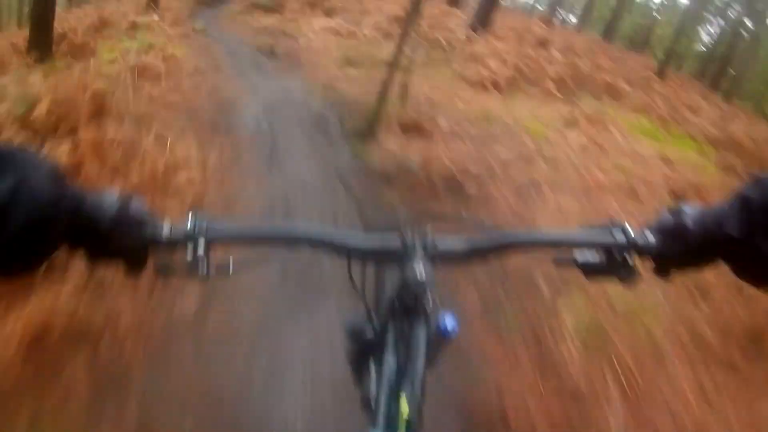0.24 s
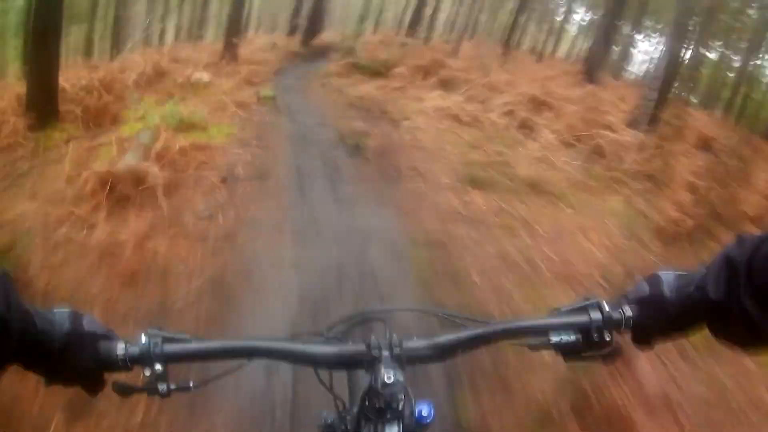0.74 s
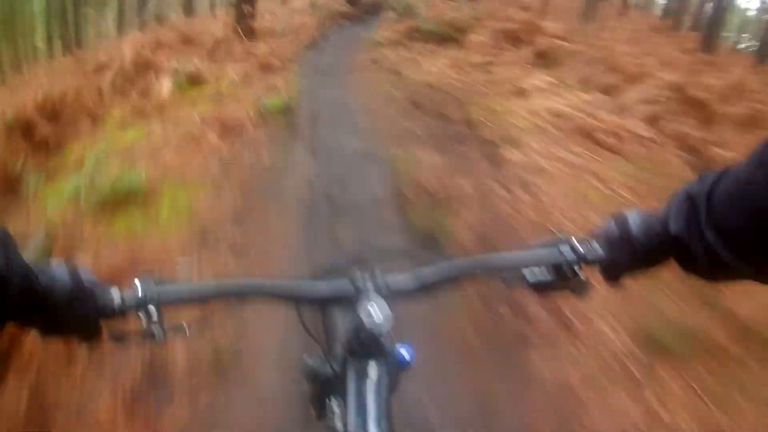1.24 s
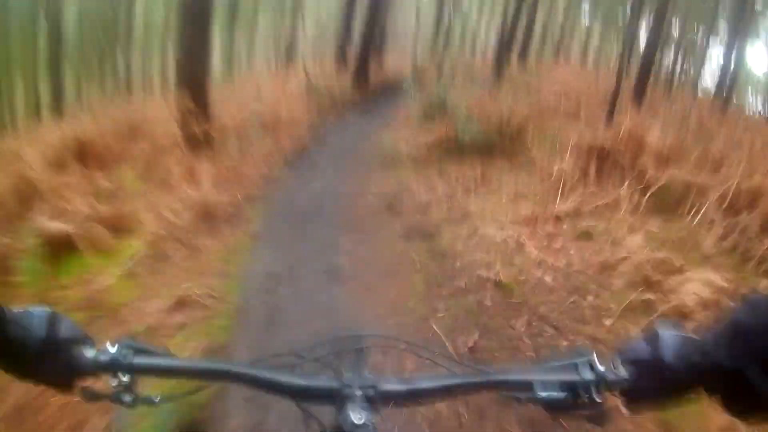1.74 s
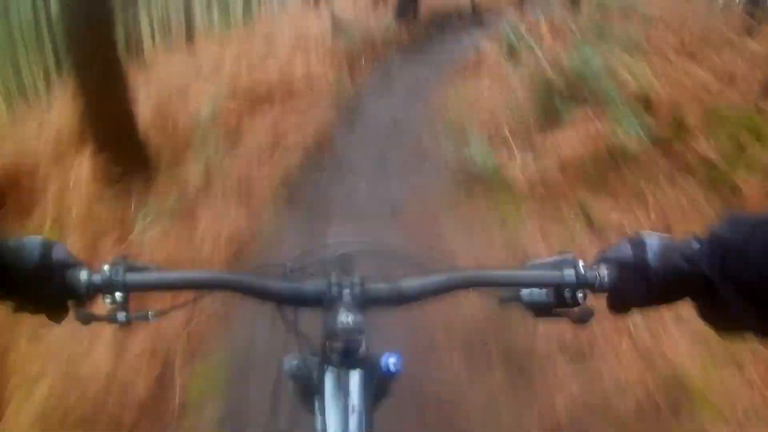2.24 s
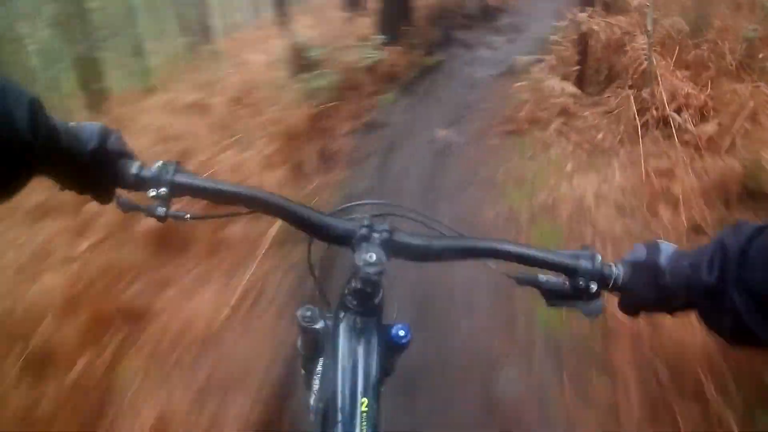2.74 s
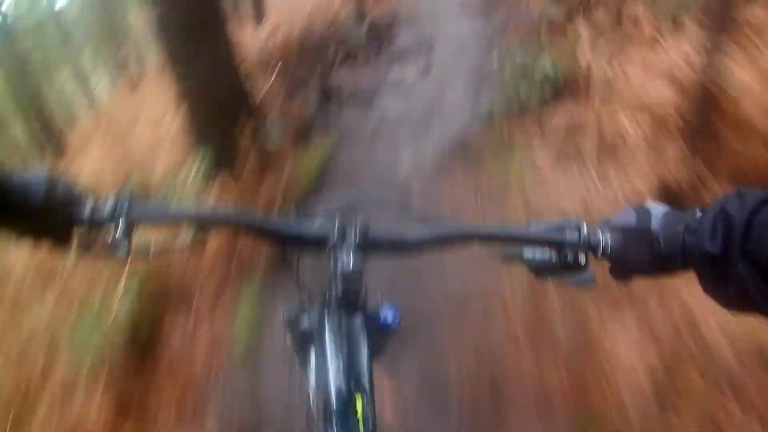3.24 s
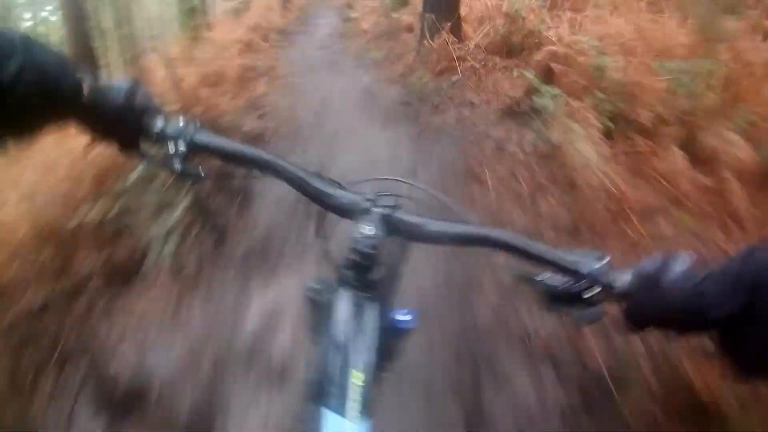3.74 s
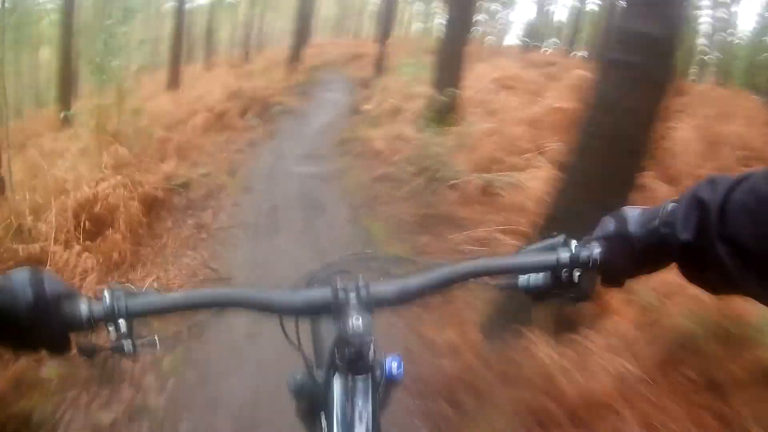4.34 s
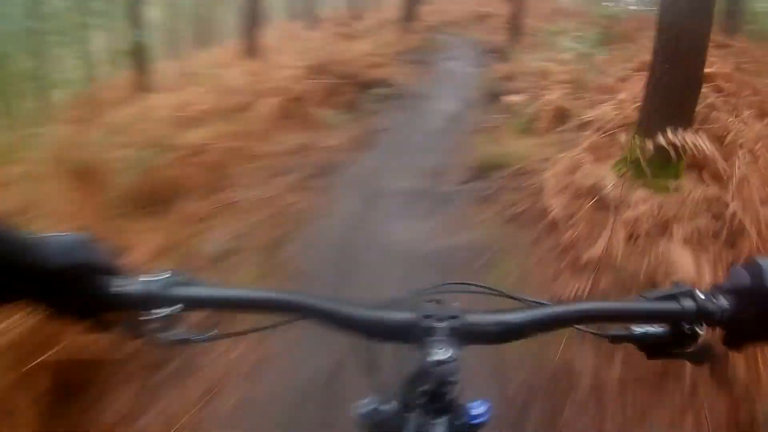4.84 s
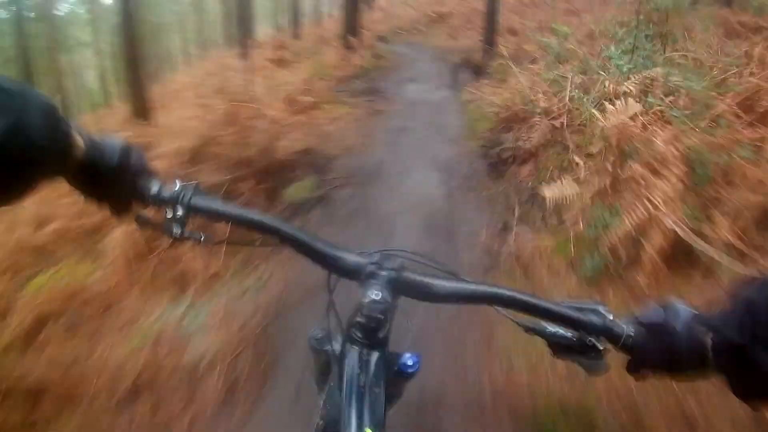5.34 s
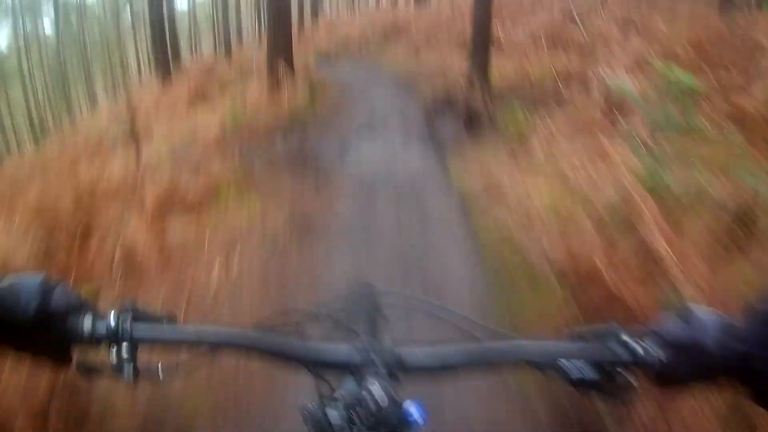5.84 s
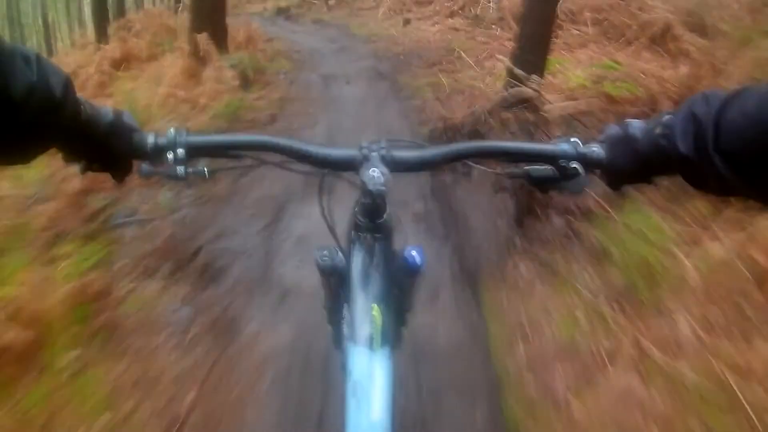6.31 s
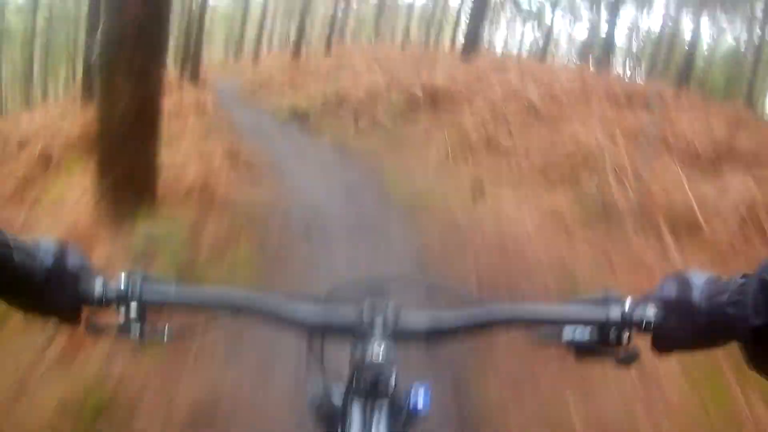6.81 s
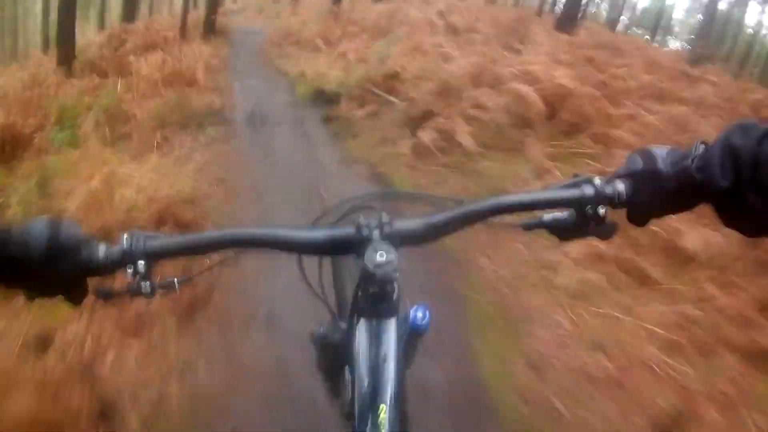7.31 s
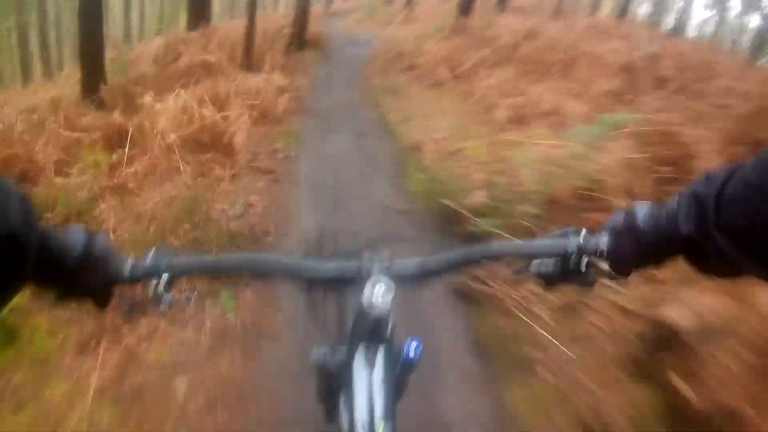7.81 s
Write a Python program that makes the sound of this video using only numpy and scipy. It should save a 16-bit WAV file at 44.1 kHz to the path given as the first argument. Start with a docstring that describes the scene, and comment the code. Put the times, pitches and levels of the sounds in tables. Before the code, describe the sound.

Heard from a microphone strapped to the rider, mountain bike tyres rumble and hiss over wet mud and grit. Heavy thumps come at the start, then a calmer stretch of scuffs and stone clicks. A double jolt near two seconds leads into rough clusters of thumps, frame knocks and chain rattle. Loud hard plastic clacks crack close by around five seconds and again near seven, in open forest without echo.

```python
"""Tyres rumble, hiss and scuff through mud and grit as a mountain bike runs fast down a wet forest trail.
Roots and stones thump the camera strapped to the rider, knock the frame and shake the chain; on the
hardest hits a plastic part clacks beside the microphone. Freehub and brake disc sound faintly.
Tyres, spray and chain are filtered noise and grit; struck parts ring in decaying modes; small stones
and the disc are short swelling sines; thumps are low-frequency pulses."""
import sys
import numpy as np
from scipy import signal
from scipy.fft import rfft, irfft, next_fast_len
from scipy.io import wavfile
from scipy.ndimage import uniform_filter1d, map_coordinates

SR = 44100
rng = np.random.default_rng(int(sys.argv[2]) if len(sys.argv) > 2 else 0)


def to_wav(s):
    """Save 16-bit WAV."""
    ch = np.atleast_2d(s).T  # columns
    pcm = np.round(np.clip(ch, -1, 1) * 32767)  # PCM
    wavfile.write(sys.argv[1], SR, pcm.astype(np.int16))


N = 355887

# Wet spray spectrum. Each row: frequency in Hz, relative level in dB.
SPRAY_SPECTRUM = [(2400, -35.5), (3000, -5.5), (3600, 1.5), (4200, -2.5), (5200, -4), (6300, -11),
                  (8000, -15), (10500, -12.5), (11900, -18.5), (12600, -61), (14000, -102)]
# Chain clatter spectrum. Each row: frequency in Hz, relative level in dB.
CHAIN_SPECTRUM = [(900, -25), (2200, 10), (2900, -0.5), (3900, 1), (5500, -4.5), (8000, -10), (11600, -7.5),
                  (12600, -60), (14000, -85.5)]
# Frame and tyre casing modes. Each row: nominal frequency in Hz, relative level in dB, t60 in s.
FRAME_MODES = [(152.5, -2, 0.023), (236, -1, 0.02), (397, -3.5, 0.016), (625, -9, 0.01)]


def amp(db):
    """Decibels to gain."""
    return 10 ** (np.asarray(db) / 20)


def unit(x):
    """x at rms 1."""
    return x / np.sqrt(np.mean(x ** 2) + 1e-20)


def peak_unit(x):
    """x with its loudest 5 ms at rms 1."""
    return x / np.sqrt(uniform_filter1d(x ** 2, size=220).max())


def wobble(knots_per_s):
    """Smooth random curve through normally distributed knots."""
    knots = rng.standard_normal(int(N * knots_per_s / SR) + 4)
    return map_coordinates(knots, [np.arange(N) * knots_per_s / SR])


def colour(x, points):
    """Causal minimum-phase filter whose gain follows (Hz, dB) points, via the folded cepstrum."""
    size = 2 * next_fast_len(len(x) // 2 + 2048)
    hz, db = np.transpose(points)
    bins_hz = np.fft.rfftfreq(size, 1 / SR)
    gain = amp(np.interp(np.log(bins_hz + 1), np.log(hz), db))
    cepstrum = irfft(np.log(gain))
    cepstrum[1:size // 2] *= 2
    cepstrum[size // 2 + 1:] = 0
    return irfft(rfft(x, size) * np.exp(rfft(cepstrum)))[:len(x)]


def add(track, s, sound):
    """Mix a sound into the track from s seconds on."""
    start = max(round(s * SR), 0)
    track[start:start + len(sound)] += sound[:len(track) - start]


def grit(rate_per_s, spread_db):
    """Random tiny impacts of rms 1: many weak, a few strong."""
    count = int(rate_per_s * N / SR)
    size_db = spread_db * np.minimum(rng.exponential(size=count), 4)
    impacts = amp(size_db) * rng.choice([-1, 1], count)
    return unit(np.bincount(rng.integers(N, size=count), impacts, N))


def burst(spectrum, rise_s, t60_s, tail_db, tail_t60_s):
    """Contact noise that decays in two stages; loudest 5 ms at rms 1."""
    t = np.arange(SR // 6) / SR
    decay = amp(-60 * t / t60_s) + amp(tail_db - 60 * t / tail_t60_s)
    force = rng.standard_normal(len(t)) * (1 - np.exp(-t / rise_s)) * decay
    return peak_unit(colour(force, spectrum))


def ring(modes, seconds, attack_s=0.00044):
    """Decaying sines of (Hz, dB, t60) modes, alternating in sign, after one blow."""
    t = np.arange(int(seconds * SR)) / SR
    out = np.zeros(len(t))
    for k, (hz, db, t60_s) in enumerate(modes):
        out += (-1) ** k * amp(db - 60 * t / t60_s) * np.sin(2 * np.pi * hz * t)
    return out * (1 - np.exp(-t / attack_s))


def chatter(sound, chatter_db, t60_s):
    """A sound, then uneven fading repeats as loose parts touch again and again."""
    touches_per_s = 900
    t = np.arange(SR // 16) / SR
    touches = (rng.random(len(t)) < touches_per_s / SR) & (t > .002)
    force = touches * rng.standard_normal(len(t)) * amp(chatter_db - 60 * t / t60_s)
    force[0] = 1
    return signal.fftconvolve(sound, force)


def knock(modes, detune, chatter_db, chatter_t60_s):
    """A compact blow on a body, its modes varied each time; loudest 5 ms at rms 1."""
    struck = [(hz * np.exp(rng.normal(0, detune)), db + rng.normal(0, 4.47), t60_s)
              for hz, db, t60_s in modes]
    return peak_unit(chatter(ring(struck, seconds=.05), chatter_db, chatter_t60_s))


def ping(hz, cycles):
    """A sine that swells to about 1 over the given cycles, then dies away."""
    t = np.arange(SR // 25) / SR
    age = t * hz / cycles
    return age * np.exp(1 - age) * np.sin(2 * np.pi * hz * t)


def effort():
    """How hard the tyres work the ground, in dB about the average."""
    # Each row: time in seconds, effort in dB (only the difference from the mean counts).
    roll = [(0.0, -56), (0.15, -54.5), (0.48, -62), (0.75, -55.5), (0.9, -63), (1.2, -59.5), (1.32, -61.5),
            (1.38, -58.5), (2.31, -54.5), (2.49, -57.5), (2.85, -57.5), (3.0, -49), (3.1, -50.5),
            (3.16, -56.5), (3.33, -60.5), (3.63, -57), (3.96, -56.5), (4.08, -55.5), (4.29, -54.5),
            (4.38, -58), (4.98, -55), (5.1, -56), (5.28, -51), (5.52, -56), (5.67, -45.5), (5.79, -53),
            (6.72, -54.5), (6.78, -58.5), (7.71, -54.5), (7.92, -60), (8.06, -58)]
    s, roll_db = np.transpose(roll)
    roll_db = np.interp(np.arange(N) / SR, s, roll_db)
    return roll_db - roll_db.mean()


def tyres(effort_db):
    """Knobs drum on the ground, crunch through clumps of grit and fling wet spray."""
    # Spectra of ground rumble and tread. Each row: frequency in Hz, relative level in dB.
    rumble_spectrum = [(12, -19), (26, 10.5), (45, -2), (70, -11), (120, -10.5), (220, -14.5), (350, -23),
                       (600, -29.5), (1200, -77.5), (8000, -115)]
    tread_spectrum = [(180, -48), (300, -4), (360, -4.5), (454, -0.5), (495, -14), (589, -13), (707, -11),
                      (825, -1), (1040, -6), (1190, -1.5), (1320, -14.5), (1430, -1), (1640, -5),
                      (3000, -23), (3900, -50.5), (6600, -120)]
    # levels at average effort, and dB gained per dB of effort
    rumble_db, rumble_growth = -41, 1.64
    tread_db, tread_growth = -56.5, 0.9
    spray_db, spray_growth = -68, 0.59
    clump_db = 5  # limit of the clumps' swing either way

    ground = wobble(25)  # uneven ground loads and unloads the tyres
    lumps = .5 * rng.standard_normal(N) + grit(rate_per_s=90, spread_db=3.0)
    rumble_level_db = rumble_db + rumble_growth * effort_db + 2.37 * ground
    rumble = unit(colour(lumps, rumble_spectrum)) * amp(rumble_level_db)

    density_db = clump_db * np.tanh(wobble(45) + wobble(11))
    clumps = unit(grit(rate_per_s=800, spread_db=3.6) * amp(density_db))
    load_db = 1.0 * ground + .7 * wobble(60)
    mud = rng.standard_normal(N) + 1.3 * clumps
    tread = unit(colour(mud, tread_spectrum)) * amp(tread_db + tread_growth * effort_db + load_db)
    drops = rng.standard_normal(N) + .55 * clumps
    spray = unit(colour(drops, SPRAY_SPECTRUM)) * amp(spray_db + spray_growth * effort_db + load_db)
    return rumble + tread + spray


def scrapes():
    """Tyres scuff through loose grit: short flurries that crunch under the tread and spray off it."""
    # Each row: start in seconds, length in seconds, crunch level in dB, spray level in dB.
    scuffs = [(0.436,0.055,-58,-68.5), (0.543,0.052,-61,-73), (0.617,0.027,-57,-70), (0.656,0.047,-58,-66),
              (1.05,0.065,-67,-74), (1.435,0.033,-55,-66.5), (1.526,0.17,-63,-67), (1.658,0.075,-54.5,-69),
              (1.726,0.088,-56,-80), (2.152,0.024,-53,-72), (2.204,0.04,-54,-81), (2.268,0.044,-54,-65),
              (2.308,0.049,-55,-70), (2.425,0.031,-52.5,-66), (3.203,0.092,-58.5,-75), (3.392,0.03,-66,-76),
              (3.454,0.061,-64,-66.5), (3.498,0.071,-58,-74), (4.026,0.087,-51,-63.5),
              (4.195,0.043,-62,-88), (4.629,0.052,-51.5,-67), (5.502,0.027,-55,-66), (5.612,0.029,-52,-60),
              (6.355,0.03,-58,-70), (6.476,0.096,-52,-64.5), (6.624,0.13,-53.5,-70), (6.946,0.072,-59,-75),
              (7.024,0.11,-58,-81), (7.297,0.033,-62.5,-80), (7.372,0.061,-57.5,-88), (7.472,0.099,-61,-68),
              (7.723,0.064,-53,-68.5)]
    # Each row: frequency in Hz, relative level in dB.
    crunch_spectrum = [(400, -36), (850, -2), (1150, 4), (1320, -2), (1500, 5.5), (1900, -13), (2400, -3),
                       (3000, -29), (5000, -63)]
    out = np.zeros(N)
    grains = grit(rate_per_s=1100, spread_db=3.8)
    crunch = unit(colour(grains, crunch_spectrum))
    spray = unit(colour(grains, SPRAY_SPECTRUM))
    for s, length_s, crunch_db, spray_db in scuffs:
        span = slice(int(s * SR), int((s + length_s) * SR))
        flurry = amp(crunch_db) * crunch[span] + amp(spray_db) * spray[span]
        add(out, s, flurry * signal.windows.tukey(len(flurry), .5))
    return out


def gravel(effort_db, count):
    """Stones click under the tread, each at its own pitch; a few are flicked clear and chatter."""
    # Flicked stones. Each row: start in seconds, note level in dB, pitch in Hz, cycles to the peak.
    flicked = [(1.214, -52, 1240, 1), (1.371, -48, 1100, 0.65), (1.578, -44, 1530, 1.8),
               (1.636, -42.5, 1930, 3.2), (1.828, -39.5, 1050, 0.89), (3.427, -44.5, 1000, .6),
               (3.973, -48, 1560, 1), (4.713, -41, 990, 0.69), (5.078, -44, 1195, .8),
               (5.178, -41, 1160, .8), (6.287, -47, 1040, .7), (6.862, -43, 1160, 0.71),
               (7.605, -49, 1540, 1)]
    smallest_db = -60.5  # smallest stones at average effort
    overtone_ratio, overtone_db = 2.2, -12.5
    out = np.zeros(N)
    for when, pitch, size in rng.random((count, 3)):
        db = smallest_db + effort_db[int(when * N)] + 11 * size ** 2
        add(out, when * N / SR, amp(db) * ping(850 * 2 ** (1.3 * pitch), cycles=1.0))
    for s, db, hz, cycles in flicked:
        note = ping(hz, cycles) + amp(overtone_db) * ping(hz * overtone_ratio, 2 * cycles)
        add(out, s, amp(db) * chatter(note, chatter_db=-5, t60_s=.035))
    return out


def thump(length_s, edge_s):
    """Camera pushed one way, snapping back as the wheel drops off the bump, and rebounding; peak 1."""
    sway_hz = 23.6  # rebound on the strap
    t = np.arange(-SR // 10, SR // 10) / SR
    fade = np.exp(-np.abs(t) / max(length_s, .001))
    push = -np.tanh(t / edge_s) * fade * np.cos(2 * np.pi * sway_hz * t)
    return push / np.abs(push).max()


def bumps():
    """Each root or stone thumps the camera, knocks the frame, rings the stem and shakes the chain."""
    # Each row: time in seconds, thump level in dB, thump length in seconds, frame knock level in dB,
    # stem ring level in dB, chain clatter level in dB.
    hits = [(0.108, -17, 0.0015, -24.5, -45, -52.5), (0.148, -20, 0.025, -31, -30, -53),
            (0.218, -19, 0.0064, -26, -27, -44), (0.226, -7.5, 0.0035, -27.5, -31.5, -48),
            (0.264, -18.5, 0.014, -23.5, -49, -54), (0.471, -46, 0.0023, -48, -61, -70),
            (0.683, -33.5, 0.011, -52, -61, -67), (0.743, -34, 0.0087, -36, -46, -58.5),
            (0.79, -34, 0.0039, -49, -53, -59), (1.47, -38, 0.0026, -40, -43, -58),
            (1.706, -29.5, 0.009, -47, -45, -62), (1.766, -36, 0.0035, -43, -61, -62),
            (1.95, -13, 0.0037, -26, -34, -46), (1.97, -12.5, 0.0037, -20, -33.5, -48.5),
            (2.274, -44, 0.013, -38.5, -37.5, -65), (2.301, -27.5, 0.022, -37, -47.5, -65),
            (2.336, -29, 0.004, -43, -60, -70), (2.356, -39, 0.0061, -42, -52, -74),
            (2.616, -25, 0.011, -36, -65, -60), (2.631, -24.5, 0.0077, -30.5, -43, -56.5),
            (2.658, -28, 0.022, -49, -41, -59), (2.71, -26.5, 0.011, -38, -62, -68),
            (2.825, -56, 0.0055, -61, -38, -78), (2.888, -22.5, 0.011, -37, -50, -57),
            (2.906, -21.5, 0.0055, -28.5, -43, -59), (2.96, -30, 0.0022, -32, -42, -59),
            (2.98, -24, 0.0022, -36.5, -35.5, -58), (3.031, -10.5, 0.0046, -46, -41.5, -47.5),
            (3.055, -21, 0.0066, -41, -42, -67), (3.069, -24.5, 0.012, -36, -60, -64),
            (3.096, -30, 0.0094, -33.5, -47, -62), (3.118, -29, 0.0065, -51, -61, -69),
            (3.253, -43.5, 0.0036, -48, -50, -70), (3.475, -43, 0.004, -48, -54, -73),
            (3.746, -49, 0.011, -43, -39, -60), (3.766, -52, 0.005, -39, -30, -61),
            (4.052, -52, 0.0025, -37, -30, -68), (4.07, -43, 0.01, -33, -47, -71),
            (4.117, -27.5, 0.0016, -25.5, -31, -49), (4.146, -20, 0.025, -36, -56, -70),
            (4.156, -14.5, 0.0026, -21, -39.5, -50.5), (4.226, -40, 0.0025, -32, -42, -56),
            (4.247, -15, 0.01, -28.5, -38.5, -51.5), (4.288, -16.5, 0.0021, -22, -40, -51.5),
            (4.322, -30, 0.0025, -39, -44, -65), (4.376, -36, 0.0069, -31, -44, -58),
            (4.568, -21, 0.0035, -48, -46.5, -63), (4.686, -37, 0.0021, -46, -49, -79),
            (4.704, -36, 0.0033, -40, -52, -78), (4.855, -24.5, 0.01, -39, -49, -51),
            (4.983, -31, 0.0071, -38, -39, -63), (5, -26.5, 0.0026, -52, -44, -64),
            (5.149, -35, 0.004, -40, -48, -60), (5.299, -14, 0.0077, -23.5, -31, -45.5),
            (5.344, -18.5, 0.021, -21, -43, -55), (5.378, -27, 0.01, -39, -43, -61),
            (5.456, -56, 0.0025, -61, -55, -81), (5.56, -20, 0.0085, -40, -58, -60),
            (5.607, -22.5, 0.011, -28.5, -30, -52), (5.691, -12.5, 0.015, -53, -45, -44),
            (5.724, -24, 0.0085, -44, -40, -56.5), (5.786, -24, 0.0023, -29, -30, -51.5),
            (5.867, -18, 0.0056, -34, -51, -54), (5.896, -21.5, 0.019, -30.5, -43, -61),
            (6.01, -20.5, 0.0084, -23, -33.5, -48), (6.035, -16, 0.017, -18.5, -46, -55),
            (6.067, -31, 0.01, -28.5, -36.5, -58.5), (6.087, -23.5, 0.0093, -40, -63, -71),
            (6.143, -20, 0.014, -30.5, -46, -55), (6.198, -30.5, 0.01, -37.5, -40.5, -73),
            (6.264, -21, 0.011, -26.5, -42.5, -54.5), (6.425, -25.5, 0.014, -29.5, -36.5, -57),
            (6.519, -33.5, 0.0033, -41, -42.5, -68), (6.672, -21.5, 0.0086, -38, -45.5, -66),
            (6.69, -28, 0.0056, -26, -43, -58), (6.713, -31, 0.0044, -40, -56, -68),
            (7.112, -28.5, 0.011, -33.5, -39, -42.5), (7.161, -20.5, 0.019, -28.5, -38, -56),
            (7.258, -54, 0.0075, -56, -72, -76), (7.357, -36, 0.01, -51.5, -68.5, -83.5),
            (7.507, -45, 0.0025, -34.5, -37.5, -61.5), (7.649, -21.5, 0.0087, -39, -44.5, -57),
            (7.703, -22, 0.011, -38.5, -68, -72), (7.743, -32.5, 0.0036, -39, -54, -66.5),
            (7.76, -33, 0.012, -39.5, -52, -69), (7.856, -38, 0.0033, -39, -50, -70.5)]
    # Stem and handlebar. Each row: nominal frequency in Hz, relative level in dB, t60 in s.
    stem_modes = [(854, -1.5, 0.014), (1135, -0.5, 0.012), (1580, -10, 0.011)]
    out = np.zeros(N)
    for s, thump_db, length_s, frame_db, stem_db, chain_db in hits:
        push = thump(length_s, edge_s=0.0014)
        frame = knock(FRAME_MODES, detune=0.095, chatter_db=-12, chatter_t60_s=0.04)
        stem = knock(stem_modes, detune=0.028, chatter_db=-5, chatter_t60_s=0.043)
        chain = burst(CHAIN_SPECTRUM, rise_s=0.01, t60_s=0.011, tail_db=-18.5, tail_t60_s=0.081)
        add(out, s + 0.002 - len(push) / SR / 2, amp(thump_db) * push)  # snap-back at s + 2 ms
        add(out, s + 0.00039, -amp(frame_db) * frame)
        add(out, s + 0.00046, amp(stem_db) * stem)
        add(out, s - .001, amp(chain_db) * chain)
    return out


def heave():
    """The camera heaved once by a blow, with a rebound on either side; centred in half a second."""
    t = np.arange(SR // 2) / SR
    u = np.hypot(t - t.mean() - .0025, .0008) / 0.0035
    return (1 - u) * np.exp(-u)


def clacks():
    """Hard plastic cracks, chatters and bounces; cables and chain shake, nearby metal rings on."""
    # Each row: time in seconds, ring level in dB, lowest modes over the middle ones in dB, treble modes
    # over the middle ones in dB, pitch ratio, crack level in dB, frame knock level in dB, thump gain in dB,
    # bounce delay in seconds, bounce level against the first contact in dB, metal ring level in dB.
    contacts = [(0.218, -21.5, -12, -18, 0.85, -40, -21, -13, .008, -22, -63),
                (3.03, -36, 3, 2, 1.14, -56, -53, -40, .01, -22, -65),
                (4.8731, -2.5, -2, -2, 0.99, -40, -35.5, -23, .0122, -39, -62),
                (5.2299, -1.8, -1.5, -5.5, 1.007, -26, -50, -45, .0135, -28, -55),
                (5.6794, 0.5, 2, -3, 1.0, -8.5, -18, 6, .003, -8.5, -42),
                (7.139, 1, 4, 2.5, 1.033, -26.5, -33, -19.5, .0143, -18.5, -45.5)]
    # Plastic mount; a close pair near 1.5 kHz beats.
    # Each row: frequency at pitch ratio 1 in Hz, relative level in dB, t60 in s.
    plastic_modes = [(800, -17, .012), (1156, -2, .014), (1499, 1, .021), (1487, 6, .011), (1962, -1, .01),
                     (2020, -21, .04), (2240, -23, .04), (2400, -8, .01), (3591, -14, .013),
                     (3976, -16, .018), (4296, -11, .014), (4975, -7, .009), (5429, -7, .006),
                     (6746, -14, .005), (10900, -25, .005)]
    # Metal part ringing along. Each row: frequency in Hz, relative level in dB, t60 in s.
    metal_modes = [(1048, 2, .45), (1510, -17, .3), (1598, -12, .2), (1960, -8, .28), (2240, -14, .16)]
    # Spectra of the crack and the cables' rattle. Each row: frequency in Hz, relative level in dB.
    crack_spectrum = [(300, 13), (1500, 3), (2700, 6.5), (4500, 5.5), (6500, -2.5), (8500, -18.5),
                      (11500, -14.5), (12400, -51.5), (16000, -84)]
    rattle_spectrum = [(350, -6), (650, -5.5), (900, -6.5), (1200, -2.5), (1330, -4.5), (1550, -13),
                       (1850, -10), (2400, -6.5), (2900, -31.5), (6000, -56.5), (13000, -96.5)]
    low_below_hz, treble_above_hz = 1300, 3000  # limits at pitch ratio 1
    cables_db, chain_db = -30.5, -45  # against the ring level
    out = np.zeros(N)
    for (s, ring_db, low_db, treble_db, pitch, crack_db, frame_db, thump_db,
         bounce_s, bounce_db, metal_db) in contacts:
        modes = []
        for hz, db, t60_s in plastic_modes:
            tilt_db = low_db * (hz < low_below_hz) + treble_db * (hz > treble_above_hz)
            modes.append((hz * pitch, ring_db + db + tilt_db, t60_s))
        plastic = ring(modes, seconds=.1, attack_s=.001)
        frame = knock(FRAME_MODES, detune=0.068, chatter_db=-8, chatter_t60_s=.04)
        crack = burst(crack_spectrum, rise_s=.0006, t60_s=.018, tail_db=-30, tail_t60_s=.06)
        cables = burst(rattle_spectrum, rise_s=0.0018, t60_s=0.04, tail_db=-16.0, tail_t60_s=0.03)
        chain = burst(CHAIN_SPECTRUM, rise_s=0.0021, t60_s=0.16, tail_db=-28, tail_t60_s=0.12)
        push = heave()
        add(out, s, chatter(plastic, chatter_db=-25, t60_s=.04))
        add(out, s + bounce_s, amp(bounce_db) * chatter(plastic, chatter_db=-8, t60_s=.03))
        add(out, s, amp(frame_db) * frame)
        add(out, s, amp(metal_db) * ring(metal_modes, seconds=.5))
        add(out, s, amp(crack_db) * crack)
        add(out, s, amp(ring_db + cables_db) * cables)
        add(out, s, amp(ring_db + chain_db) * chain)
        add(out, s - (len(push) - 1) / 2 / SR, amp(thump_db) * push)
    return out


def freehub():
    """Steel pawls skip over ratchet teeth in spells that swell and fade; every click rings the same modes."""
    # Start of each spell in seconds.
    spell_starts = [0.01, 0.865, 1.76, 2.535, 3.05, 3.661, 4.32, 5.063, 5.951, 6.742, 7.549]
    # Each row: frequency in Hz, relative level in dB, t60 in s.
    pawl_modes = [(6900, -5, 0.006), (8500, -8, 0.0084), (9450, -1, 0.011), (10640, 1, 0.005),
                  (10760, -8, 0.0072), (11530, -4, 0.009)]
    spell_s, click_db = .125, -63
    mean_teeth_per_s = 380
    out, t = np.zeros(N), np.arange(SR // 30) / SR
    click = sum(amp(db - 60 * t / t60_s) * np.sin(2 * np.pi * hz * t) for hz, db, t60_s in pawl_modes)
    click *= (1 - np.exp(-t / 0.00016)) ** 2
    click /= np.abs(click).max()
    for start in spell_starts:
        teeth_per_s = mean_teeth_per_s * (1 + rng.normal(0, .08))
        teeth = np.arange(start, start + spell_s, 1 / teeth_per_s)
        for s, fade in zip(teeth, signal.windows.tukey(len(teeth), .7)):
            slip_s, force_db = rng.normal(0, [.00002, 2.5])
            add(out, s + slip_s, amp(click_db + force_db) * fade * click)
    return out


def brake_disc():
    """A soft, high tink each time the disc brushes its pad."""
    # Time of each touch in seconds.
    tinks = [0.565, 1.229, 1.531, 1.872, 2.933, 3.267, 3.469, 4.069, 4.537, 4.833, 5.372, 7.268, 7.836]
    disc_hz, disc_db = 9420, -68.5
    out = np.zeros(N)
    for s in tinks:
        add(out, s, amp(disc_db) * ping(disc_hz, cycles=42))
    return out


def scene():
    """All sources close to one microphone; the open forest gives no echo."""
    effort_db = effort()
    rolling = tyres(effort_db) + scrapes() + gravel(effort_db, count=260)
    return (rolling + bumps() + clacks() + freehub() + brake_disc())[None]


def record(dry):
    """Deep bass is removed, peaks clip at full scale; dull above 12 kHz and silent above 16.4 kHz."""
    bass_cut_hz, dull_above_hz, silent_above_hz = 18, 12000, 16400
    x = signal.sosfiltfilt(signal.butter(2, bass_cut_hz, "highpass", fs=SR, output="sos"), dry)
    x = np.clip(x, -1, 1)
    x = signal.sosfilt(signal.ellip(8, .3, 26, dull_above_hz, fs=SR, output="sos"), x)
    size = next_fast_len(N + SR // 2)
    audible = np.fft.rfftfreq(size, 1 / SR) < silent_above_hz
    return irfft(rfft(x, size) * audible, size)[:, :N]


dry = scene()
out = record(dry)
to_wav(out)
```